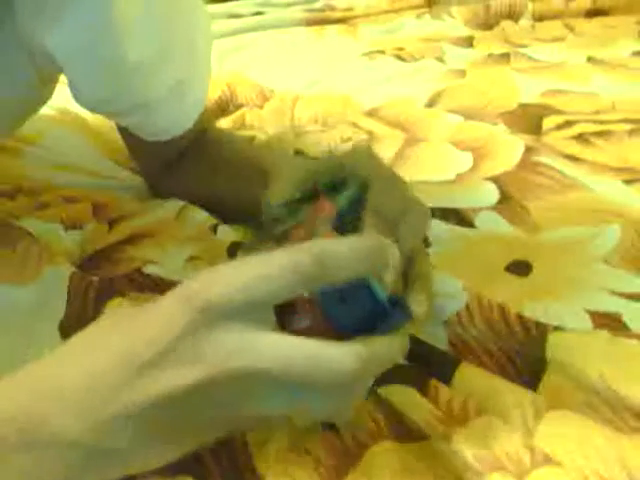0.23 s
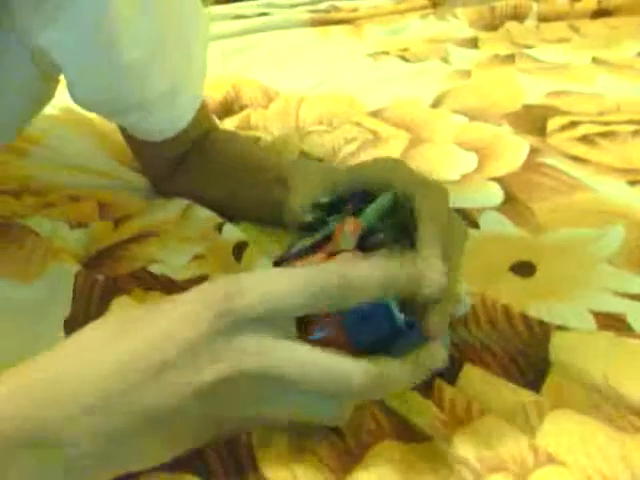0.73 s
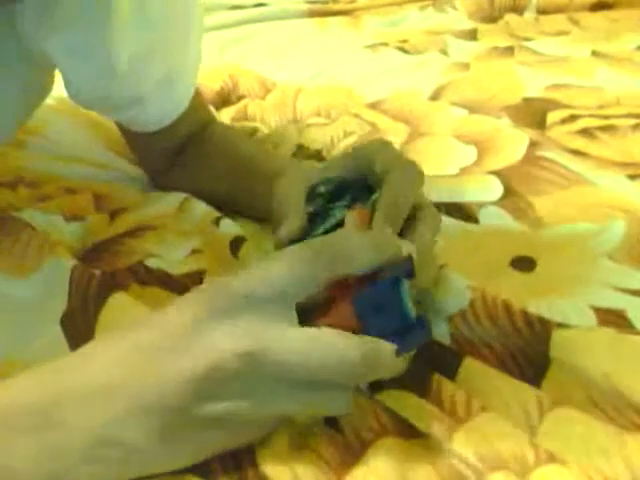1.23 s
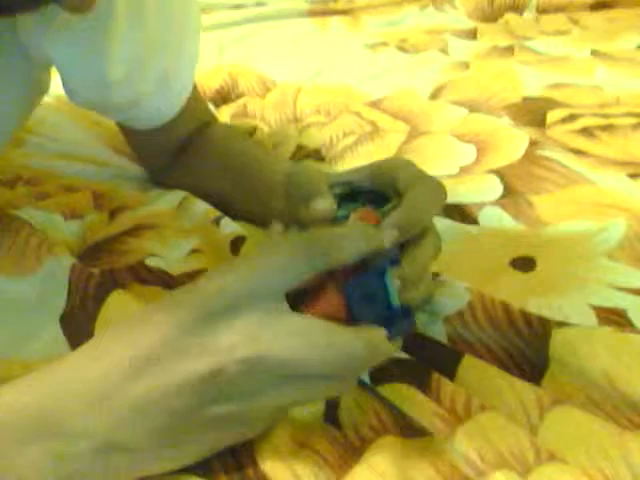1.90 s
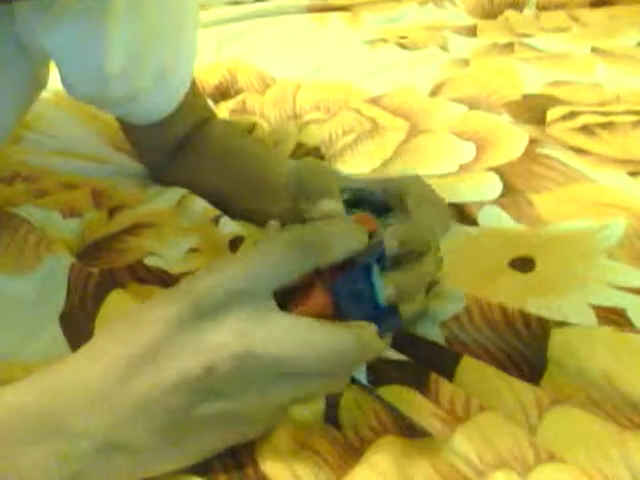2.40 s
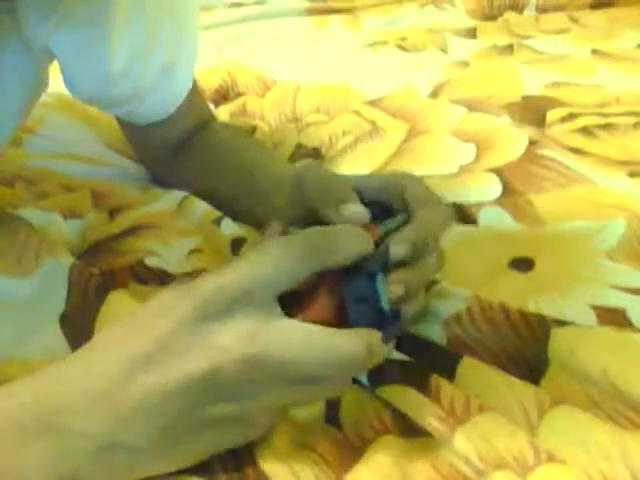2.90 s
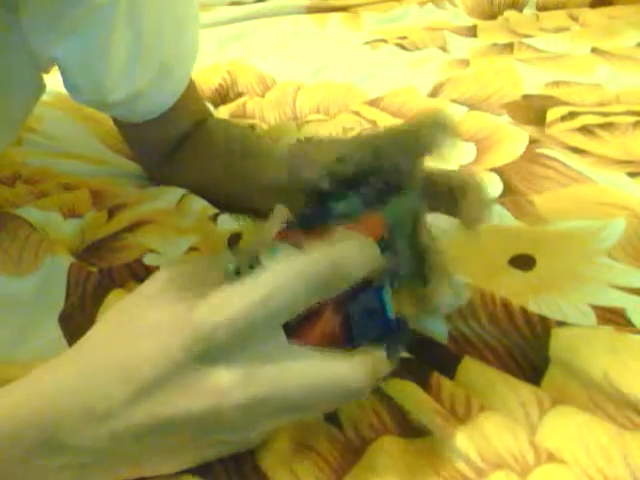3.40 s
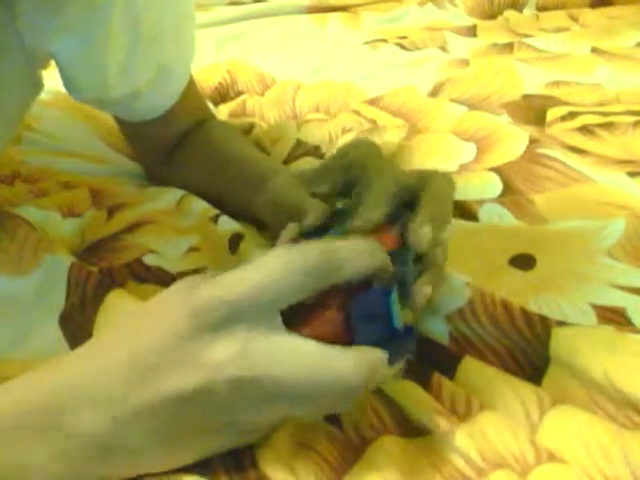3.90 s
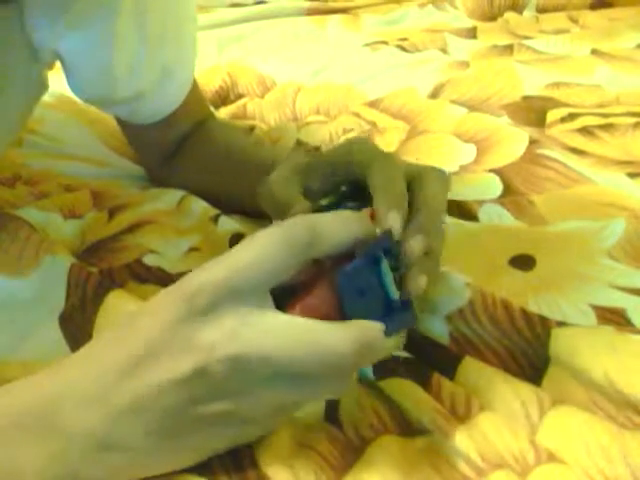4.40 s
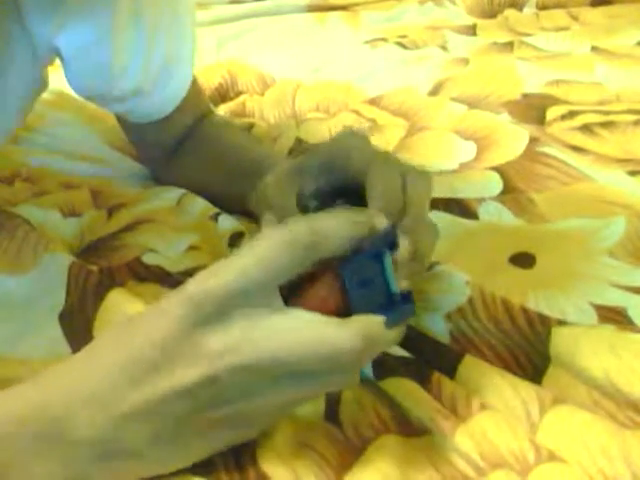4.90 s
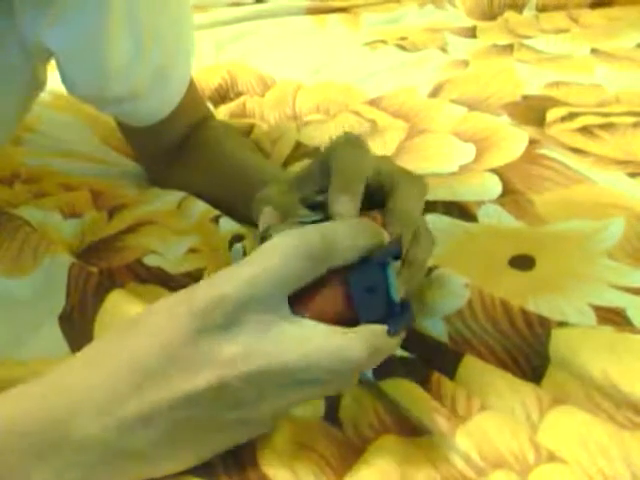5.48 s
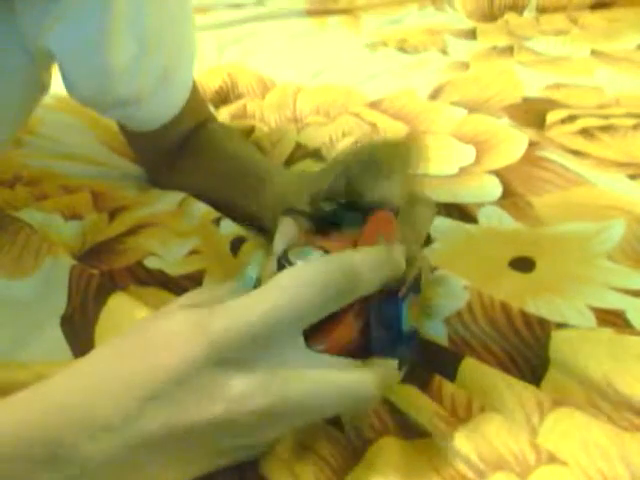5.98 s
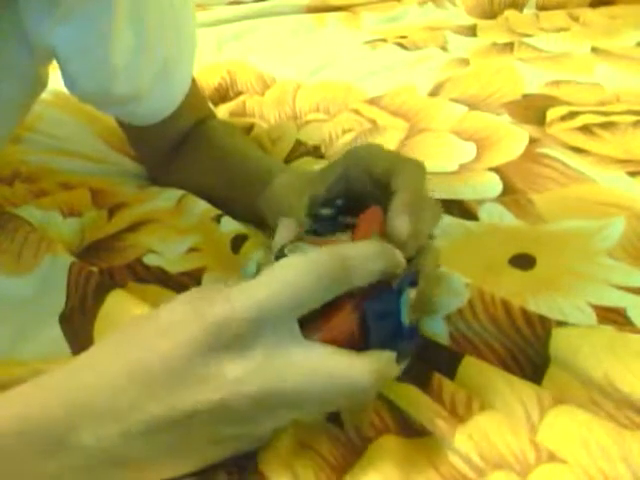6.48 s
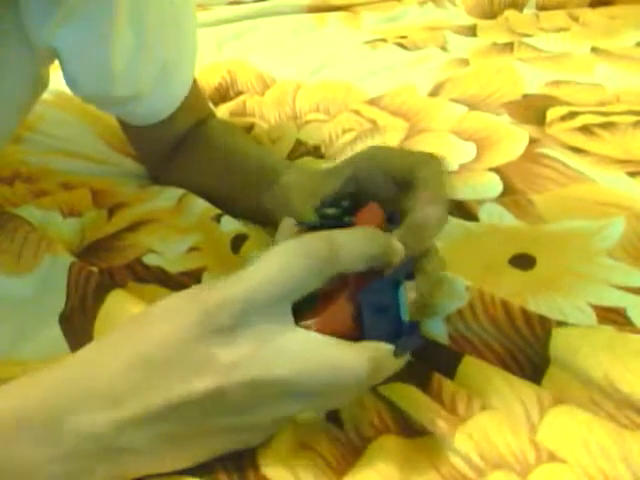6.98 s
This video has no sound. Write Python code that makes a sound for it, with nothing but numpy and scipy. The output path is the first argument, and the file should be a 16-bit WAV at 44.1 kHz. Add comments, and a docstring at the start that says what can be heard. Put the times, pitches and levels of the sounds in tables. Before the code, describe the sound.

Hard plastic toy joints click, crack and snap in rapid irregular bursts very close up, with small rattles, soft mattress thuds and faint hiss.

```python
"""Two hands fold a hard plastic toy on a bed, close to a small camera with a peaky microphone.
Struck modes click and snap from the first moment, thickly for some four seconds; noise-driven modes rattle
and slide between them. Low resonances thud through the mattress, brushed cloth is band noise, and a diffuse
tail answers the snaps over faint hiss. After a quieter fifth second the hardest snaps, just before six,
overload the input and jolt the bed; sparser clicks and slides follow, and two snaps come near the end."""
import sys
import numpy as np
from scipy import signal
from scipy.fft import rfft, irfft
from scipy.io import wavfile
from scipy.ndimage import uniform_filter1d

SR = 44100
rng = np.random.default_rng(int(sys.argv[2]) if len(sys.argv) > 2 else 0)


def master(y):
    """Save y as 16-bit WAV."""
    cut = np.clip(np.atleast_2d(y).T, -1, 1)
    pcm = np.round(cut * 32767)  # scale
    wavfile.write(sys.argv[1], SR, pcm.astype(np.int16))


def invert_db(x):
    """Field ratio 10**(x/20) for x, a level in decibels (scalar or array-like)."""
    u = np.asarray(x, float) / 20
    return 10 ** u


N = 319284

# Snaps of the joints, levels relative:
# [t/s, bright crack level/dB, body knock level/dB, pitch of the snapping part f/Hz]
SNAPS = [(.041, -23, -52, 6000), (.062, -1.5, -18, 2840), (0.077, -10, -15.5, 2540),
         (0.0956, -17.5, -20, 2700), (0.131, -4.5, -22.5, 2900), (.186, -13, -31, 5650),
         (.345, -7, -16.5, 4930), (0.352, -20.5, -24.5, 2970), (0.4498, -33, -32.5, 4130),
         (0.5064, -15.5, -23.5, 3100), (0.519, 0, -22, 5630), (0.5235, 3, -17, 5700),
         (0.5749, -6, -18, 3160), (0.5814, -7, -17.5, 5000), (.672, -29, -35.5, 4300),
         (0.75, -15, -20.5, 3670), (0.832, -27, -27, 4470), (0.8667, -9, -19, 4000), (.899, -12, -36, 6100),
         (0.9724, -20.5, -43, 4000), (1.02, -18.5, -43, 5950), (1.0659, 1.5, -25, 5660),
         (1.0826, 2.5, -23.5, 3040), (1.0922, -14, -15.5, 2400), (1.18, -11.5, -35, 5130),
         (1.1941, -11.5, -19.5, 6500), (1.209, -11.5, -31.5, 3000), (1.212, -14.5, -30, 4760),
         (1.281, -14.5, -28.5, 2850), (1.3275, -30, -34, 2610), (1.35, -34, -38, 2600),
         (1.3736, -1, -20, 1200), (1.401, -32, -30, 2600), (1.4302, -10.5, -30, 2200),
         (1.474, -32.5, -31, 2000), (1.5787, -10, -36, 4570), (1.612, -22, -29, 5230),
         (1.647, -25, -28.5, 3950), (1.685, -25.5, -41, 3900), (1.7508, -9, -32, 5830),
         (1.7558, -0.5, -30, 4020), (1.779, -29, -37, 4000), (1.829, -14.5, -45, 5000),
         (1.87, -26.5, -33, 3460), (1.89, -20.5, -40, 6060), (1.9578, -6.5, -26, 2680),
         (1.987, -8.5, -30.5, 3520), (2.016, -22.5, -39, 6000), (2.108, 0, -26, 5760),
         (2.1388, -7.5, -30.5, 4270), (2.2524, -21.5, -28.5, 5840), (2.2598, -15, -30, 4260),
         (2.2891, -12, -22, 6230), (2.3228, -29, -36, 2700), (2.3257, 1.5, -21, 6240),
         (2.3862, -19.5, -29.5, 5900), (2.4379, -10.5, -34, 4350), (2.443, -10.5, -50, 6000),
         (2.4627, -9.5, -30, 5900), (2.4778, -13, -40, 4200), (2.4976, -8.5, -45, 6370),
         (2.5069, -7, -9.5, 5980), (2.568, -25, -40, 4180), (2.613, -9, -19, 5280),
         (2.7103, -19, -30, 2720), (2.7392, -11, -22.5, 6340), (2.7685, -18, -38, 5000),
         (2.779, -32, -27.5, 6200), (2.797, -25, -41, 3100), (2.8075, -6.5, -24, 4260),
         (2.8478, -17, -34.5, 6130), (2.873, -33, -35, 4530), (2.99, -29.5, -36, 4100),
         (3.0103, 0, -17, 4860), (3.104, -7.5, -22, 4600), (3.1418, -20.5, -34, 4100),
         (3.231, -21.5, -39, 2430), (3.25, -25, -34, 3370), (3.2789, -12.5, -25.5, 3200),
         (3.3335, -46.5, -24.5, 3270), (3.3963, -7, -18.5, 6200), (3.424, -20, -33, 2200),
         (3.4757, -12.5, -42, 5600), (3.498, -42, -29, 4520), (3.5659, -19.5, -24, 2580),
         (3.59, -23, -33, 2530), (3.6397, -32, -32, 2520), (3.674, -34.5, -35, 2550),
         (3.69, -41, -33.5, 2300), (3.73, -22, -31.5, 3700), (3.8171, -14.5, -21, 3570),
         (3.846, -20, -32.5, 4500), (3.889, -5.5, -33, 1800), (4.0351, -14.5, -32, 3960),
         (4.0775, -29, -28, 4220), (4.347, -35, -40.5, 7300), (4.531, -15, -32, 2520),
         (4.5368, -37, -27, 2330), (4.5435, -2.5, -16.5, 3770), (4.5694, -7.5, -17.5, 5960),
         (4.617, -51, -23, 2610), (4.632, -17, -23, 4520), (4.6594, -41, -25.5, 2420),
         (4.665, -12.5, -37, 2760), (4.7074, -26.5, -25.5, 2740), (4.7236, -13.5, -30, 1020),
         (4.8386, -61, -31.5, 2600), (4.8708, -63, -34.5, 2650), (4.8952, -57, -32, 2550),
         (5.052, -27.5, -38, 4800), (5.094, -35.5, -46, 6030), (5.143, -18, -30.5, 4900),
         (5.262, -38, -44, 5500), (5.28, -35, -32.5, 3420), (5.355, -27, -39, 5500),
         (5.48, -35.5, -49, 4000), (5.5, -27.5, -36.5, 3600), (5.52, -20.5, -56, 6030),
         (5.572, -60, -34, 2650), (5.6439, -51, -37, 2700), (5.68, -29.5, -43, 6260),
         (5.698, -28.5, -39, 5000), (5.7196, -7, -17.5, 3760), (5.7814, -7.5, -9.5, 4870),
         (5.7878, -5, -11, 5170), (5.8242, 0, -13.5, 4650), (5.8445, 1.5, -22, 5880),
         (5.845, 12, -3.5, 5410), (5.909, -21, -16, 5740), (5.9327, -12, -16, 3850),
         (5.9412, -13, -21.5, 3800), (5.9487, -3.5, -27.5, 3340), (5.959, -17.5, -4.5, 5940),
         (5.9599, -3.5, -31, 6150), (6.0295, -12.5, -32.5, 4300), (6.235, -35, -59, 6260),
         (6.2652, -10, -28, 4330), (6.2693, -10.5, -18, 4400), (6.2794, -23, -17.5, 3400),
         (6.313, -33.5, -43, 2600), (6.3745, -27, -29, 2640), (6.423, -17, -42, 3760),
         (6.431, -36, -27.5, 4450), (6.4357, -3.5, -8, 5250), (6.465, -21.5, -31, 4000),
         (6.624, -30.5, -53.5, 5500), (6.633, -37.5, -41, 3470), (6.666, -32.5, -58, 6300),
         (6.838, -20, -23, 6650), (6.947, -37.5, -38.5, 4200), (7.1656, -18.5, -57.5, 6230),
         (7.1861, 0.5, -9.5, 3480), (7.1902, -12, -17.5, 2980)]
# Modes of the toy's shells, damped by the fingers; the last row is no mode of the shells but adds a thin band
# near 15 kHz that sounds whenever the treble rings loudly: [f/Hz, relative level/dB, 60 dB decay t/s]
SHELL_MODES = [(1062, -25, 0.01), (1900, -24, 0.005), (2200, -15, 0.006), (2650, -10, 0.011),
               (3070, -11, 0.008), (3615, -12, 0.007), (4200, -10, 0.007), (4904, -12, 0.006),
               (5900, -11, 0.006), (7154, -18.5, 0.003), (8383, -16, 0.004), (9840, -20.5, 0.0053),
               (11800, -29, 0.00096), (14800, -9, 0.003)]
# Borders between the low, middle and bright modes: [f/Hz]
GROUP_EDGES = [3300, 6300]
# A part slips free and rattles or scuffs on, levels relative:
# [t/s, bright modes level/dB, middle and low modes level/dB, 60 dB decay t/s]
RATTLES = [(0.518, -12.5, -26.5, 0.11), (5.784, -6, -20, 0.082), (5.83, -18, -36, 0.13),
           (5.843, -9, -20.5, 0.18), (5.96, -21.5, -61, 0.083), (6.262, -12, -42, 0.11),
           (6.7, -43.5, -43.5, 0.21), (6.968, -68, -47.5, 0.24), (7.186, -17.5, -39.5, 0.13)]
# Fingers rub over the shells, swelling and fading, levels relative:
# [middle t/s, bright modes level/dB, middle and low modes level/dB, half length t/s]
RUBS = [(0.01, -46, -52.5, 0.29), (0.932, -51, -55.5, 0.071), (1.263, -53, -57.5, 0.14),
        (1.527, -38, -49, 0.098), (1.838, -49, -54, 0.083), (2.078, -54, -61, 0.04),
        (3.473, -55, -55.5, 0.23), (3.915, -44.5, -53.5, 0.052), (5.513, -43.5, -60, 0.018),
        (5.849, -38, -44, 0.057), (6.179, -54.5, -63.5, 0.017), (6.331, -49.5, -53, 0.074),
        (6.62, -51.5, -62, 0.037), (6.897, -56, -86, 0.058)]
# Weight shifts on the bed, levels before lumps: [t/s, shake of the camera level/dB, cloth level/dB]
SHIFTS = [(.02, -40, -51), (0.398, -41, -55), (.7, -44, -61), (0.898, -46, -53), (1.35, -45.5, -50.5),
          (1.52, -49.5, -50), (2.04, -52, -61), (2.7, -41.5, -61), (3.1, -45.5, -57), (3.45, -45, -66),
          (3.93, -53, -60), (4.2, -51, -59), (4.839, -49.5, -56), (5.22, -54.5, -61.5), (5.859, -39, -41),
          (6.058, -37, -63), (6.33, -50, -46.5), (6.409, -55.5, -49.5), (7.24, -45.5, -43.5)]
# The bed at rest, levels before lumps: [shake level/dB, cloth level/dB]
BED_AT_REST = (-64.5, -63)
# A hand or the toy scuffs the sheet: [t/s, centre f/Hz, level/dB, 60 dB decay t/s]
SCUFFS = [(.83, 990, -53.5, 1), (2.615, 1390, -47, 0.12), (3.819, 950, -41.5, 0.22),
          (3.89, 940, -46.5, 0.29), (4.72, 1010, -56, 0.56), (5.24, 1840, -50.5, 0.31),
          (5.49, 1620, -48.5, 0.14), (6.47, 1600, -51.5, 0.34), (6.578, 1600, -43, 0.06),
          (6.59, 900, -39.5, 0.068), (6.7, 1670, -39, 0.18), (6.97, 1750, -47.5, 0.19)]
# Spectral shape of the hiss: [f/Hz, relative density level/dB]
HISS_SHAPE = [(20, 7), (110, -2.5), (300, -3), (700, -15), (1000, -7), (1400, -20), (2000, -13),
              (2800, -19), (5000, -24), (8000, -31), (16000, -34.5)]


def snaps():
    """Impulsive excitation: a brief chatter of contacts rings the shells and the part; harder ones chatter longer."""
    chatter_s, harder_s, rise_s = 0.0006, 0.0023, 0.00015
    part_cycles, part_db = 22, 0.5  # cycles in which the part fades by 60 dB
    large_part_hz, even_part_hz, lean_db_per_octave = 2200, 2795, 18.5
    spot_db, detune = 2.5, 0.056

    s, crack_db, knock_db, part_hz = np.transpose(SNAPS)[:, :, None]
    # the knock shifts from the low modes to the middle ones as the snapping part gets smaller
    lean_db = lean_db_per_octave * np.log2(np.maximum(part_hz, large_part_hz) / even_part_hz)
    middle_db = knock_db + np.minimum(lean_db, 0)
    low_db = knock_db - np.maximum(lean_db, 0)

    t = np.arange(512) / SR
    chance = rng.standard_normal((len(s), len(SHELL_MODES) + 1, 2 + len(t)))
    push = np.exp(-(t / (chatter_s + harder_s * invert_db(crack_db))) ** 2) * np.minimum(t / rise_s, 1)

    def ring(hz, t60, chatter):
        """Convolution of a decaying mode with the contact force, peak 1."""
        mode = np.sin(2 * np.pi * hz * t) * decay(t, t60)
        y = signal.fftconvolve(mode, chatter * push, axes=1)
        return y / np.abs(y).max(axis=1, keepdims=True)

    sound = invert_db(knock_db + part_db) * ring(part_hz, part_cycles / part_hz, chance[:, -1, 2:])
    for k, (hz, db, t60) in enumerate(SHELL_MODES):
        # each contact spot favours other modes, each grip detunes them
        spot, grip = chance[:, k, :1], chance[:, k, 1:2]
        level_db = db + by_group(hz, crack_db, middle_db, low_db) + spot_db * spot
        sound = sound + invert_db(level_db) * ring(hz * (1 + detune * grip), t60, chance[:, k, 2:])

    # the chatter begins 12 samples ahead of the listed time
    at = np.round(s * SR).astype(int) - 12 + np.arange(sound.shape[1])
    return np.bincount(at.ravel(), sound.ravel(), N + 4096)[:N]


def slide():
    """Friction: uneven tiny contacts over the smooth hiss of skin on plastic excite the shell modes."""
    contacts_per_s, spread_db, skin_db = 390.0, 4.0, -1.0
    mode_db, low_db = 10.0, 1.5
    bright, body = slide_levels()

    struck = rng.random(N) < contacts_per_s / SR
    ticks = struck * invert_db(spread_db * np.minimum(rng.exponential(size=N), 3))
    # every contact lasts 40 samples
    ticks = uniform_filter1d(ticks, size=40) * rng.standard_normal(N)
    push = unit(ticks) + invert_db(skin_db) * rng.standard_normal(N)

    sound = 0
    for hz, db, t60 in SHELL_MODES:
        level = by_group(hz, bright, body, body * invert_db(low_db))
        sound = sound + invert_db(db + mode_db) * level * band(push, hz, 5.84 / t60)
    return sound


def slide_levels():
    """Superposition of envelopes: slips after every snap, rubs and rattles give bright and body gains."""
    slip_bright_db, slip_body_db, slip_t60_s = -43.5, -28, 0.19  # relative to crack and knock
    clock = np.arange(N) / SR
    s, crack_db, knock_db, _ = np.transpose(SNAPS)

    def slip(db):
        """Exponential decay started anew by each snap."""
        starts = np.bincount((s * SR).astype(int), invert_db(db), N)
        return signal.lfilter([1], [1, -decay(1 / SR, slip_t60_s)], starts)

    bright, body = slip(crack_db + slip_bright_db), slip(knock_db + slip_body_db)
    for middle_s, bright_db, body_db, half_s in RUBS:
        swell = np.exp(-((clock - middle_s) / half_s) ** 2)
        bright, body = bright + invert_db(bright_db) * swell, body + invert_db(body_db) * swell
    for start_s, bright_db, body_db, t60 in RATTLES:
        t = clock - start_s
        fade = (t > 0) * decay(np.abs(t), t60)
        bright, body = bright + invert_db(bright_db) * fade, body + invert_db(body_db) * fade
    return bright, body


def by_group(hz, bright, middle, low):
    """Modal grouping: choose the level that belongs to the frequency range of a mode."""
    return (low, middle, bright)[np.searchsorted(GROUP_EDGES, hz)]


def room(x):
    """Reverberation: walls answer after a short gap with a quickly fading, diffuse tail."""
    t60_s, level_db, gap_s = 0.12, -12, 0.0067
    t = np.arange(SR // 4) / SR
    tail = rng.standard_normal(len(t)) * decay(t, t60_s) * np.clip(t / gap_s, 0, 1) ** 3
    tail = tail / np.sqrt(np.sum(tail ** 2))
    return invert_db(level_db) * signal.fftconvolve(x, tail)[:N]


def bed():
    """Forced resonance: pushes on the mattress rock the camera and ring its support; the sheet rustles low."""
    jolt_s, jolt_db, jolt_width_s = 5.871, -14.5, 0.016
    shake_db, cloth_db = shifting()
    # the pushes come in lumps, felt most in the rocking
    lumps = unit(band(rng.standard_normal(N), 14.0, 7.3))
    rocking_db = 0.8 * shake_db - 12.0 + 4.47 * lumps
    support_db = shake_db + 2.1 * lumps
    rustle_db = cloth_db + 2.8 * lumps

    # the biggest snap jolts the mattress once
    t = (np.arange(N) / SR - jolt_s) / jolt_width_s
    sound = invert_db(jolt_db) * (2 * t ** 2 - 1) * np.exp(-t ** 2)
    # level/dB, f/Hz, width of each resonance f/Hz
    for db, hz, width_hz in [(rocking_db, 28., 40.), (support_db, 108., 30.), (rustle_db, 310., 330.)]:
        sound = sound + invert_db(db) * noise_band(hz, width_hz)
    return sound


def shifting():
    """Build-up and relaxation: shake and cloth levels rise fast with each shift and settle slowly to rest."""
    rise_db_per_s, fall_db_per_s = 157, 84
    s, *levels = np.transpose(SHIFTS)[:, :, None]
    t = np.arange(N) / SR - s
    below_db = np.where(t < 0, -t * rise_db_per_s, t * fall_db_per_s)
    return [np.maximum((db - below_db).max(axis=0), rest_db) for db, rest_db in zip(levels, BED_AT_REST)]


def scuffs():
    """Friction noise: short dull brushes on cloth, each a decaying noise band with its own colour."""
    attack_s, width = 0.0079, 0.39  # width of each resonance as a share of its centre
    out = 0
    for s, hz, db, t60 in SCUFFS:
        t = np.maximum(np.arange(N) / SR - s, 0)
        envelope = np.minimum(t / attack_s, 1) * decay(t, t60)
        out = out + invert_db(db) * envelope * noise_band(hz, hz * width)
    return out


def hiss():
    """Stationary noise: a shaped spectrum gives the steady room and circuit hiss."""
    level_db = -56
    hz, db = np.transpose(HISS_SHAPE)
    f = np.maximum(np.fft.rfftfreq(N, 1 / SR), 1)
    shape = invert_db(np.interp(np.log(f), np.log(hz), db))
    return invert_db(level_db) * unit(irfft(rfft(rng.standard_normal(N)) * shape, N))


def unit(x):
    """Normalisation to rms 1."""
    return x / np.sqrt(np.mean(x ** 2))


def decay(t, t60):
    """Exponential damping: 60 dB lost in t60 seconds."""
    return np.exp(-np.log(1000) * t / t60)


def band(x, hz, width_hz):
    """Resonance with gain 1 at its centre."""
    return signal.lfilter(*signal.iirpeak(hz, hz / width_hz, fs=SR), x)


def noise_band(hz, width_hz):
    """Resonances in cascade: white noise passed twice through one resonance, rms 1."""
    return unit(band(band(rng.standard_normal(N), hz, width_hz), hz, width_hz))


def scene():
    """Superposition of toy, its echo, bed, scuffs and hiss; so small an object radiates little bass."""
    clicks = snaps()
    radiation = signal.butter(3, 1350, "high", fs=SR, output="sos")
    toy = signal.sosfilt(radiation, clicks + room(clicks) + slide())
    return (toy + bed() + scuffs() + hiss())[None]


def band_limit(x):
    """A steep low-pass at the top of the band."""
    return signal.sosfilt(signal.butter(12, 16290, fs=SR, output="sos"), x)


def record(dry):
    """Cavity resonance: the microphone's port rings in the treble and dulls what lies above; the input clips."""
    port_hz, port_q = 8183, 6.32
    dip_hz, dip_width_hz = 12640, 5000.0
    limit, top_hz = 0.93, 15900
    # prewarped, so that the digital resonance keeps its frequency
    w = SR * 2 * np.tan(np.pi * port_hz / SR)
    heard = signal.lfilter(*signal.bilinear([w ** 2], [1, w / port_q, w ** 2], SR), dry)
    heard = heard - 0.7 * band(heard, dip_hz, dip_width_hz)
    clipped = np.clip(heard, -limit, limit)
    mix = signal.sosfilt(signal.butter(8, top_hz, fs=SR, output="sos"), clipped)
    return band_limit(mix)


dry = scene()
out = record(dry)
master(out)
```